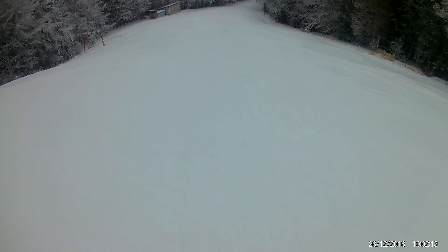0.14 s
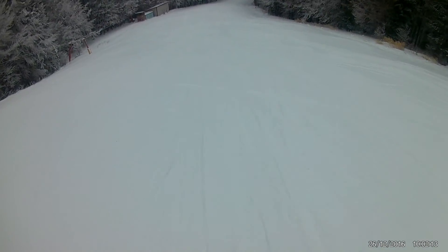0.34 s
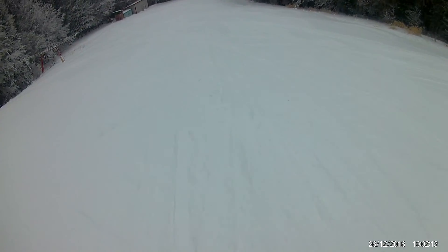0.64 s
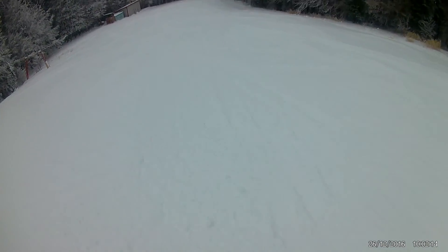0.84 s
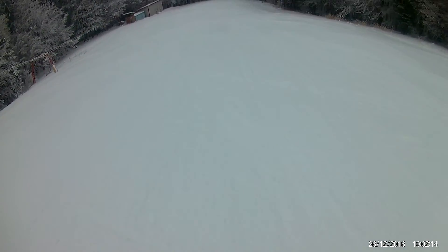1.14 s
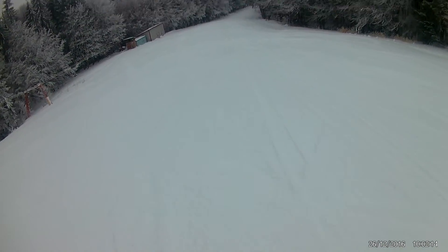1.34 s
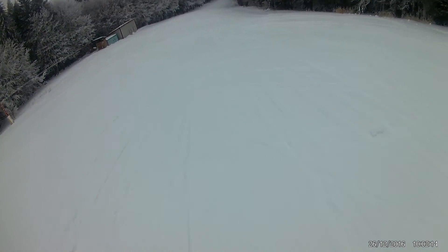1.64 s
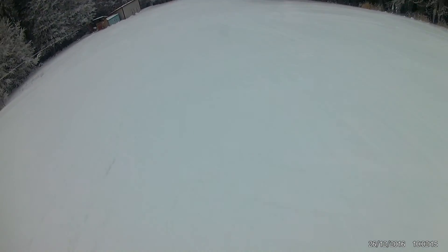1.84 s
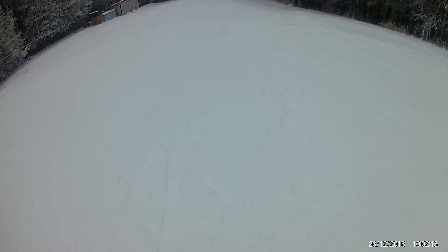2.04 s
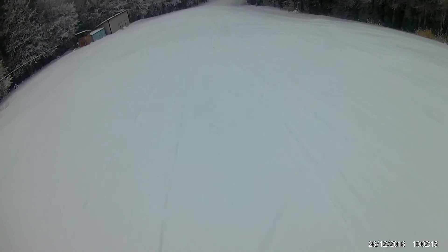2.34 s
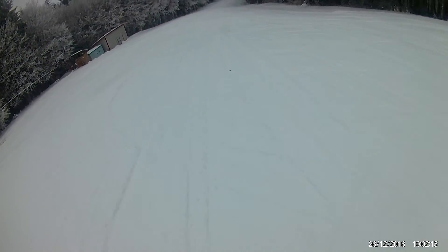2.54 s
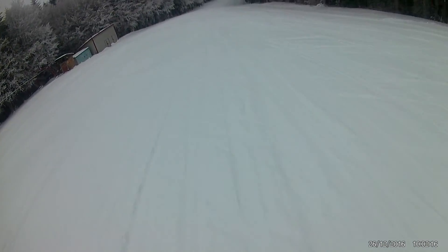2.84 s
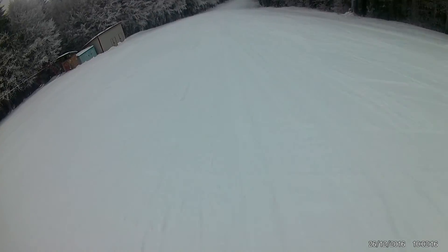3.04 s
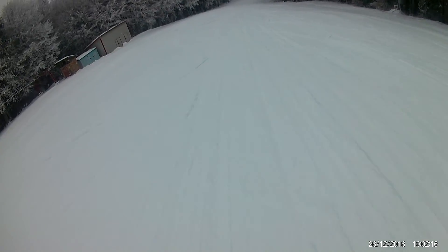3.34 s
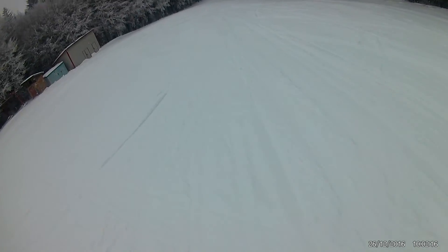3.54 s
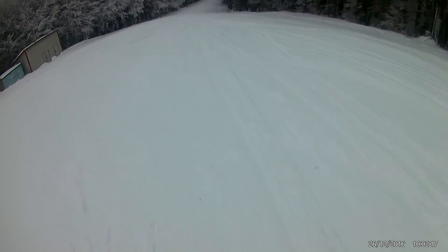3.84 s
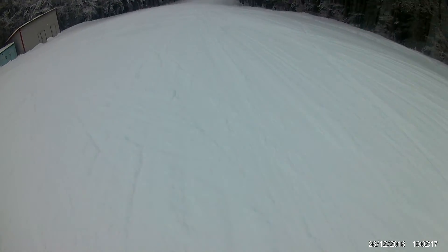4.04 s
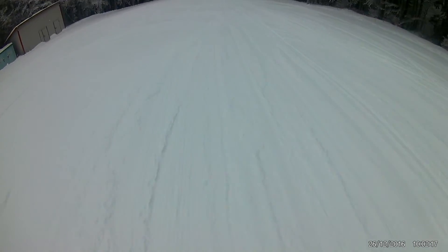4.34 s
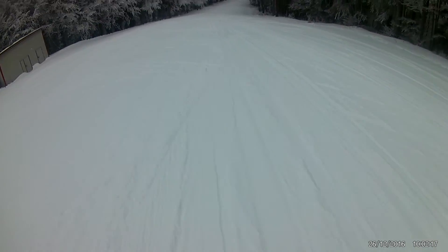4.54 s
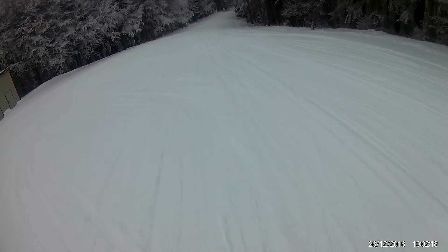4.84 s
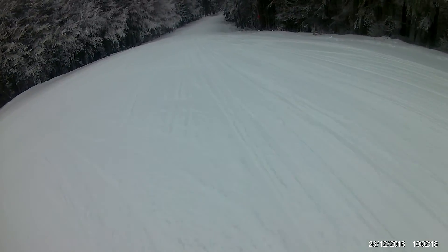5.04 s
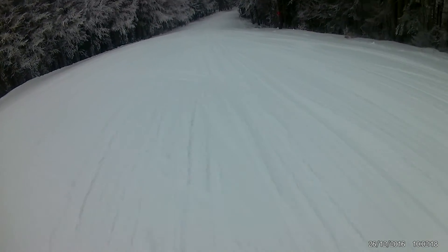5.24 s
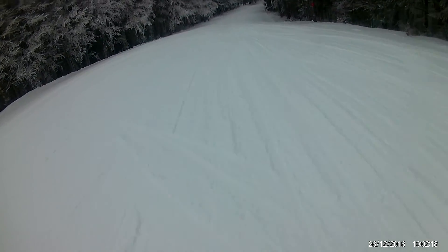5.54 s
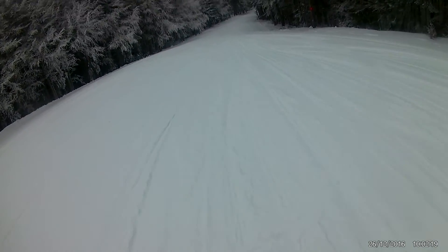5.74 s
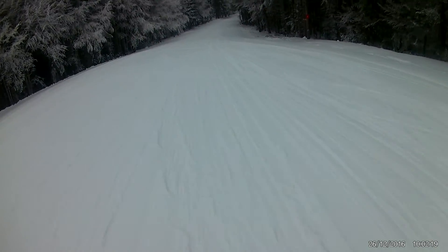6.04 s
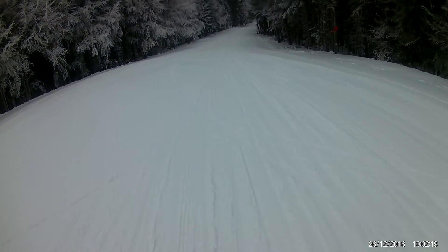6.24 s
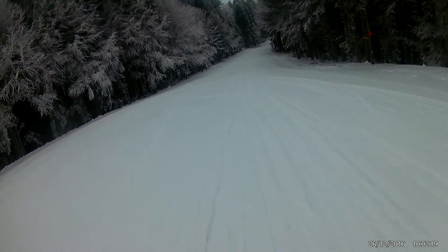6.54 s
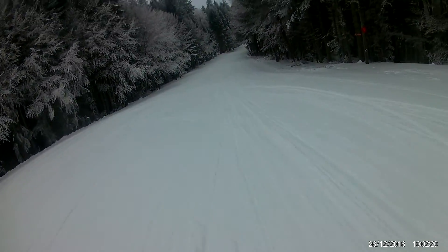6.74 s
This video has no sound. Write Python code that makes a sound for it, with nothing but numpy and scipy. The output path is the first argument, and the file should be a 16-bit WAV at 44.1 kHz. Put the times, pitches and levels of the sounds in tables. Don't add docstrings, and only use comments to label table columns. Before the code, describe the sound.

Outdoors on a snowy slope between trees, runners scrape constantly over packed snow, grainy and midrange, coloured by the hollow plastic housing around the microphone. Air flutters past in a low hum that swells and breaks up, with dull buffeting. Loose mount parts rattle, rub and briefly squeak; tiny snow grains tick on the case. Hard, dry knocks stand out early and late, with a duller run between.

```python
import sys
import numpy as np
from scipy import signal
from scipy.fft import rfft, irfft
from scipy.io import wavfile
from scipy.ndimage import uniform_filter1d

SR = 44100
rng = np.random.default_rng(int(sys.argv[2]) if len(sys.argv) > 2 else 0)


def dump(signal):
    limited = np.clip(np.atleast_2d(signal).T, -1, 1)
    pcm = np.round(limited * 32767).astype(np.int16)
    wavfile.write(sys.argv[1], SR, pcm)


def nominal_scale(level):
    x = np.asarray(level, float) / 20
    return 10 ** x


N = 304290
T = np.arange(N) / SR


def noise():
    return rng.standard_normal(N)


def unit(x):
    return x / np.sqrt(np.mean(np.abs(x) ** 2))


def curves(table):
    s, *columns = np.transpose(table)
    return [np.interp(T, s, column) for column in columns]


def swells(table):
    return sum(db * np.exp(-(2 * (T - s) / (1.3 * length)) ** 2) for s, length, db in table)


def colour(x, points, peaks=(), size=4096):
    hz = np.arange(1, size // 2 + 2) * SR / size
    outline_hz, outline_db = np.transpose(points)
    db = np.interp(np.log(hz), np.log(outline_hz), outline_db)
    for centre, width, peak_db in peaks:
        db = db + peak_db / (1 + (2 * (hz - centre) / width) ** 2)
    cepstrum = irfft(np.log(nominal_scale(db)), size)
    cepstrum[1:size // 2] *= 2
    cepstrum[size // 2 + 1:] = 0
    response = irfft(np.exp(rfft(cepstrum)), size)
    return signal.fftconvolve(x, response / np.sqrt(np.sum(response ** 2)))[:len(x)]


def band(x, lo_hz, hi_hz, order=2):
    return signal.sosfilt(signal.butter(order, [lo_hz, hi_hz], "bandpass", fs=SR, output="sos"), x)


def walk(rate_hz):
    hold = int(SR / rate_hz)
    steps = np.repeat(rng.standard_normal(N // 20), hold)[:N]
    return unit(uniform_filter1d(uniform_filter1d(steps, hold), hold))


def grains(rate_hz, spread_db):
    chance = rng.random((3, N))
    hit = chance[0] < rate_hz / SR
    size = nominal_scale(-spread_db * np.log(1 - .99 * chance[2]))
    return unit(hit * np.sign(chance[1] - .5) * size)


def add(out, s, x):
    i = int(s * SR)
    out[i:i + len(x)] += x[:N - i]


# (time [s], hum level [dB], shedding frequency [Hz])
AIRFLOW = [(0, -44.5, 152), (.4, -41.5, 168), (1.2, -41, 165), (1.35, -35.5, 176), (2.1, -40, 168),
           (2.42, -31.5, 180), (2.95, -41, 178), (3.1, -31.5, 162), (3.33, -35, 151.7), (3.45, -36, 175),
           (3.9, -35.5, 172), (4.07, -50.5, 170), (4.42, -41, 175), (4.65, -37.5, 170), (5.95, -32, 168),
           (6.1, -47, 168), (6.28, -41, 145), (6.6, -30.5, 172)]
# (time [s], length [s], level [dB])
PUFFS = [(.14, 0.037, 9.5), (1.28, 0.034, 7.5), (1.56, 0.06, 9.5), (1.81, 0.04, 9.5), (2.01, .08, 6),
         (2.2, 0.059, 4), (2.51, 0.049, -11), (2.63, .07, -1), (4.0, 0.033, 17), (4.36, 0.023, 11.5),
         (4.57, 0.046, 10.5), (4.9, 0.21, 6), (4.98, 0.042, -7), (5.05, 0.11, 3.5), (5.18, 0.039, -9.5),
         (5.62, 0.073, 2), (5.78, 0.076, 2), (6.7, 0.035, 4), (6.77, 0.047, -11), (6.865, 0.026, -9)]
# (frequency [Hz], level [dB per Hz])
BUFFET_SPECTRUM = [(12, -12), (30, 9.5), (60, 18), (100, 14), (135, 13), (200, -12.5), (300, -23),
                   (600, -52.5), (3000, -92)]
# (time [s], length [s], level over the steady buffet [dB])
GUSTS = [
    (.3, 0.074, 3),
    (1.4, 0.21, 5.5),
    (1.67, 0.066, 10),
    (1.8, 0.026, 15),
    (2.2, .2, 6.5),
    (3.27, 0.081, 5),
    (3.42, 0.2, 8),
    (4.11, 0.093, 5.5),
    (5.8, 0.13, 4),
    (6.14, 0.25, 6.5),
]


def wind():
    hum_db, shed_hz = curves(AIRFLOW)
    wander = 1 + 0.03 * walk(40) + 0.01785 * walk(9)
    phase = np.cumsum(2 * np.pi * shed_hz * wander / SR)
    ragged = walk(70) + 1j * walk(70) + 0.53 * (walk(160) + 1j * walk(160))
    hum = unit(np.real((1 + 0.7 * ragged) * np.exp(1j * phase)))
    buffet = unit(colour(noise(), BUFFET_SPECTRUM, size=16384)) * nominal_scale(1.1 * walk(5.2))
    return hum * nominal_scale(hum_db + swells(PUFFS)) + buffet * nominal_scale(-47.5 + swells(GUSTS))


# (time [s], scrape level [dB])
LOAD = [(0, -44), (.71, -43.5), (1.5, -41.5), (2.46, -40.5), (2.72, -42), (3.02, -42), (3.36, -41),
        (3.57, -40.5), (3.8, -43.5), (4.0, -44), (4.73, -41), (5.73, -42), (6.15, -42), (6.53, -40.5),
        (6.9, -42)]
# (frequency [Hz], level [dB per Hz])
WALL = [(130, -1.5), (220, -3), (422, -11.5), (589, -14), (1030, -15.5), (1330, -6), (1860, -12.5),
        (2370, -17), (2670, -29.5), (3070, -22.5), (4150, -29), (5970, -45), (8200, -41.5), (10700, -69),
        (18000, -120)]
# (frequency [Hz], width [Hz], level [dB])
CASE = [(1380, 270, 4), (1660, 300, 2), (1850, 220, 2), (2130, 200, -3), (2800.5, 486.5, -2.5),
        (4220, 140, 4.5), (4792, 200, -0.5), (5990, 580, 10.5), (6960, 430, -2.5), (8050, 1000, -8.5),
        (9170, 340, 1.5), (10270, 1100, 12.5), (488.7, 34, 1)]
USUAL_LOAD_DB = -42


def slide():
    scrape_db, = curves(LOAD)
    extra_db = scrape_db - USUAL_LOAD_DB
    boom_db, spray_db = -46.5 + 1.42 * extra_db, -53.5 + 0.91 * extra_db
    crunch = (noise() + 0.52 * grains(800., 2.288)) * nominal_scale(0.4 * walk(17) + 1.0 * walk(60))
    lumps = colour(crunch + 0.5 * grains(100., 3.04), WALL, CASE)
    grit = colour(crunch + 0.39 * grains(200., 4.1), WALL, CASE)
    boom = unit(band(lumps, 239.0, 1220.0)) * nominal_scale(boom_db + 2.0 + 0.47 * walk(20))
    scrape = unit(band(lumps, 1205.0, 3055.3, order=3)) * nominal_scale(scrape_db + 1.33 + 0.7 * walk(45))
    spray = unit(band(grit, 2684.0, 8050, order=3)) * nominal_scale(spray_db - 0.97 + 0.38 * walk(25))
    return boom + scrape + spray


# (time [s],
# peak level [dB], middle treble over the top [dB])
TICKS = [(0.122, -58, 15.5), (1.5514, -57, 3), (0.355, -55, 5), (.6734, -55.5, 5), (.9772, -32, 5),
         (1.136, -53, 10.5), (1.6823, -58, 15), (1.8831, -59, 9), (1.9609, -56.5, 5), (2.2296, -50, 10.5),
         (2.3333, -52.5, 4), (2.4042, -44.5, 7), (2.9088, -62, 14), (3.1004, -60, 13.5), (3.1624, -55, 5),
         (3.407, -60, 12), (3.451, -52, 9), (3.5309, -52, 4), (4.563, -57, 11), (4.621, -54, 5),
         (4.816, -58, 14.5), (5.298, -56, 10.5), (5.4916, -54, 12), (5.506, -52, 9), (5.559, -48.5, -13),
         (5.894, -53, 12.5), (1.6531, -62, 15), (6.529, -62, 13), (6.584, -51, 7.5), (6.8077, -59, 12)]
# (frequency [Hz], level [dB per Hz])
TICK_SPECTRUM = [(2500, -29.5), (4000, 9), (6000, -6), (7500, 4), (9000, -3), (11000, 1.5), (13000, -8),
                 (16000, -13)]
# (time [s], length [s], level over the thin hail [dB])
SHOWERS = [
    (.55, .15, 2),
    (1.65, 0.24, 2),
    (3.15, .15, 8),
    (3.45, 0.14, 12),
    (4.65, 0.35, 4),
    (5.48, .2, 6),
    (6.5, .2, 3),
]


def ticks():
    top, middle, t = np.zeros(N), np.zeros(N), T[:200]
    chance = rng.standard_normal((len(TICKS), len(t)))
    for (s, db, middle_db), rough in zip(TICKS, chance):
        click = rough * np.exp(-t / 0.0015) * (1 - np.exp(-t / 0.00016))
        add(top, s, nominal_scale(db - 4.5) * click)
        add(middle, s, nominal_scale(db + middle_db + 7.0) * click)
    hail_db = 1.1 * (curves(LOAD)[0] - USUAL_LOAD_DB) + swells(SHOWERS) - 82.5 + 1.2 * walk(5.0929)
    hail = grains(70., 4.5) * nominal_scale(hail_db)
    bright_hail = colour(hail, TICK_SPECTRUM, [(10100, 2500, 8.5), (13500, 3000, -4.5)])
    high = band(colour(top, TICK_SPECTRUM, CASE) + bright_hail, 6300, 16000)
    return high + band(colour(middle + 5 * hail, TICK_SPECTRUM, CASE), 3500, 6300)


# (time [s], length [s], level [dB], squeak relative level [dB])
RUBS = [(0.3, 0.11, -47, -27), (0.888, 0.048, -43.5, -22), (1.048, 0.037, -37.5, -23),
        (2.512, 0.049, -38.5, -23), (4.211, 0.03, -39.5, -21), (4.582, 0.11, -42.5, -18),
        (4.89, .03, -42.5, -12), (5.057, 0.054, -46, -14), (5.339, 0.12, -41.5, -17),
        (6.354, 0.06, -38.5, -17.5), (6.768, 0.01, -41, -30), (1.61, 0.07796, -47, -21.5),
        (1.7, 0.18, -46, -18), (3.378, 0.17, -45.5, -13), (5.457, 0.087, -41, -18.5)]


def rubs():
    body, squeak = np.zeros(N), np.zeros(N)
    slips = band(grains(1500., 1.1) * nominal_scale(2.0 * walk(150)), 800, 4500, order=3)
    for s, length, db, squeak_db in RUBS:
        shape = np.sin(np.pi * np.clip((T - s) / length, 0, 1)) ** 0.95
        body += nominal_scale(db) * shape
        squeak += nominal_scale(db + squeak_db) * shape
    modes = band(slips, 1730.0, 1953.0) + 1.1 * band(slips, 2250, 2450)
    modes += 0.65 * band(slips, 1365, 1650.0) + 0.57 * band(slips, 1600, 1900)
    modes += 0.018 * band(slips, 2500, 4800)
    thin = band(slips, 4620, 5000, order=1) + .5 * band(slips, 4750, 4900)
    return body * unit(modes) + squeak * unit(thin)


# (time [s], peak level [dB], pitch [Hz], thud level [dB], crack level [dB])
KNOCKS = [(.3022, -27, 1850, -5.5, -29), (.9769, 2.0, 1660, -25, -29), (.9845, -5.5, 1620, -25, -28),
          (.997, -19.5, 1700, -23, -32), (1.2739, -8.5, 1538, -20, -25), (1.279, -45, 2180, -20, -7),
          (1.3181, -20.5, 1498, -17, -33), (1.6164, -22.5, 1520, -23, -12.5),
          (1.6813, -24, 1399, -12, -14.5), (2.4316, -25, 1385, -10, -32), (3.4064, -32, 2300, -4, -10),
          (3.4348, -22.5, 1370, -12, -23), (3.4692, -21.5, 1530, -17, -25), (3.4925, -19, 1530, -23, -30),
          (3.5018, -12, 1460, -7, -25), (3.5048, -16, 1350, -4, -30), (3.8668, -26, 1690, -10.5, -30),
          (5.4801, -26.5, 1380, -9.5, -23.5), (6.6509, -3.5, 1660, -24, -21), (6.6548, -20, 1660, -13, -23),
          (6.7, -22, 843, -8, -35), (6.703, -27, 405, -25, -35), (6.7401, -34, 1336, 0, -29),
          (6.765, -21.5, 1450, -6, -24.5)]
# (time [s], peak level [dB], pitch [Hz])
RATTLE = [(0.7117, -29, 1500), (.8156, -27.5, 1410), (.889, -30.5, 2260), (.993, -35, 1621),
          (1.0606, -25.5, 1430), (1.169, -28, 1430), (1.3361, -26, 1520), (1.4478, -29, 1380),
          (1.4826, -27.5, 1420), (1.6474, -22, 1520), (1.7193, -25.5, 1410), (1.7981, -22, 1430),
          (1.8557, -33, 1607), (2.3343, -28, 1520), (2.5159, -28.5, 1860), (3.3804, -28, 1350),
          (3.385, -25, 1400), (3.547, -31, 1470), (4.1162, -32, 1380), (4.206, -35, 1940),
          (4.3033, -24, 1470), (4.444, -26, 1380), (4.6151, -26, 1520), (4.894, -27, 1960),
          (5.0484, -30, 1745), (5.0644, -24.5, 1650), (6.3757, -27, 1520), (6.3893, -21.5, 1500),
          (6.6097, -23, 1360), (6.796, -29, 880)]
# (frequency [Hz], level [dB], decay time t60 [s])
RING = [(544, -4, 0.063), (904, -11.5, 0.073), (1512, -12.5, 0.023), (1650, 13, 0.022),
        (1790, -17.5, 0.018), (2202, 6.5, 0.028), (3295, 0, 0.023), (4280, -9.5, 0.028), (4520, -22, 0.048)]
# (frequency [Hz], level [dB per Hz])
CRACK_SPECTRUM = [(1800, -17), (2600, 3.5), (3600, 0), (4500, 8), (5200, -8), (6200, -38.5), (8000, -46),
                  (16000, -72.5)]
RATTLE_THUD_DB, RATTLE_CRACK_DB = -13, -25


def knocks():
    out, crack, t = np.zeros(N), np.zeros(N), T[:SR // 10]
    rattle = [(*row, RATTLE_THUD_DB, RATTLE_CRACK_DB) for row in RATTLE]
    rows = np.vstack([KNOCKS, rattle])
    chance = rng.standard_normal((len(rows), len(RING) + 1, 2))
    grit = rng.standard_normal((len(rows), len(t)))
    rise = (1 - np.exp(-t / 0.00045)) ** 2
    for (s, db, hz, thud_db, crack_db), c, g in zip(rows, chance, grit):
        contact_ms = 3.6 * (1500 / hz) ** 0.45 + .035 * (thud_db - RATTLE_THUD_DB)
        progress = np.clip(t * 1000 / contact_ms, 0, 1)
        push = np.sin(np.pi * progress ** 0.85) ** 0.75
        x = push * np.sin(2 * np.pi * hz * t)
        thud_hz = 520 * (1 + 0.15 * c[-1, 0])
        x += nominal_scale(thud_db - 1.5) * push * np.sin(2 * np.pi * thud_hz * t)
        free = progress ** 2
        for (f, ring_db, t60), (pitch, size) in zip(RING, c):
            near_db = -6.0 * abs(np.log2(f / hz))
            if f > 2900:
                near_db += crack_db + 24
            elif f < 1000:
                near_db += 0.35 * thud_db + 8
            tone = np.sin(2 * np.pi * f * (1 + .02 * pitch) * t + 3 * size)
            decay = np.exp(-np.log(1000) * t / t60)
            x += nominal_scale(ring_db + near_db - 16.5 + 1.5 * size) * free * tone * decay
        chatter = g * (push + 0.22 * rise * np.exp(-t / 0.0039))
        x += nominal_scale(0.54 * thud_db + 4.5) * band(chatter, 350, 2089.3, order=5)
        add(out, s - .0006, nominal_scale(db - 4.0) * x)
        rough = g * (push + 0.22 * rise * np.exp(-t / 0.005))
        add(crack, s - .0006, nominal_scale(db + crack_db - 3.5) * rough)
    return out + colour(crack, CRACK_SPECTRUM, CASE)


def scene():
    return (wind() + slide() + ticks() + rubs() + knocks())[None]


# (frequency [Hz], level [dB per Hz])
HISS_SPECTRUM = [(4120, -39), (7000, -1.5), (7980, -1), (8610, -1.5), (12300, -4.5), (15100, -0.5),
                 (16000, -16)]


def self_noise():
    hiss = colour(noise(), HISS_SPECTRUM, CASE[9:11])
    return hiss / np.std(band(hiss, 8000, 19000, order=6)) * nominal_scale(-81.8)


def low_pass(x):
    return signal.sosfilt(signal.butter(12, 15800, fs=SR, output="sos"), x)


def record(dry):
    port = signal.lfilter(*signal.iirnotch(7850, 9.0, fs=SR), dry)
    x = 0.28 * dry + 0.8 * port + self_noise()
    overload = 1.02
    mix = x / (1 + np.abs(x / overload) ** 12) ** (1 / 12)
    return low_pass(mix)


dry = scene()
out = record(dry)
dump(out)
```